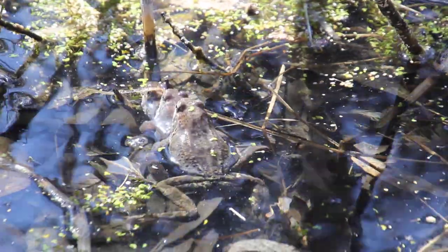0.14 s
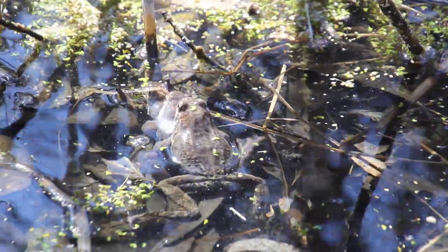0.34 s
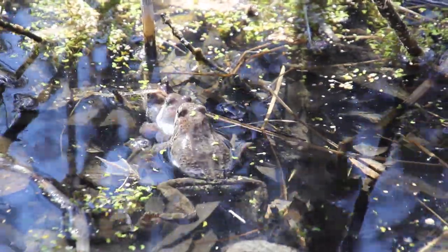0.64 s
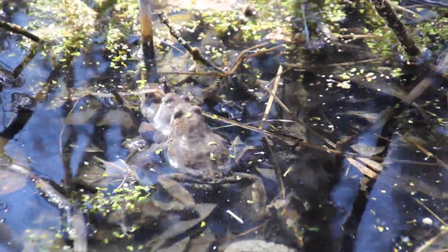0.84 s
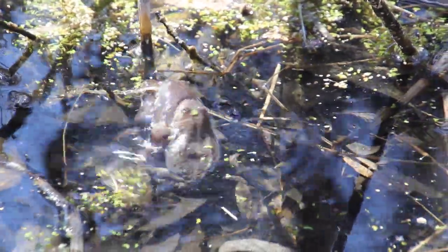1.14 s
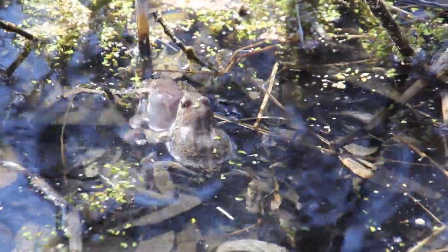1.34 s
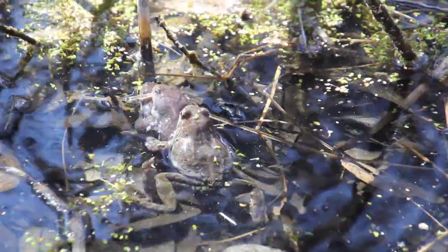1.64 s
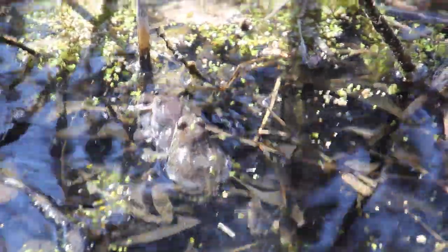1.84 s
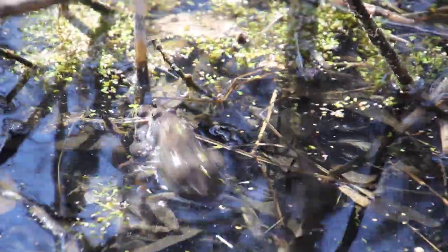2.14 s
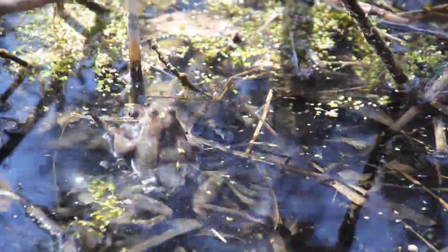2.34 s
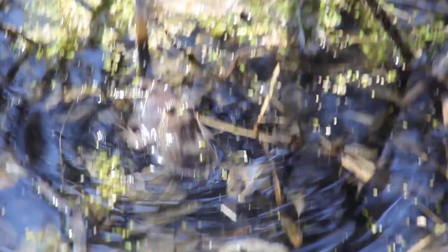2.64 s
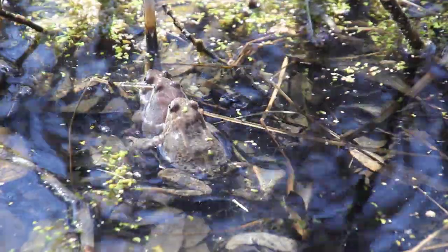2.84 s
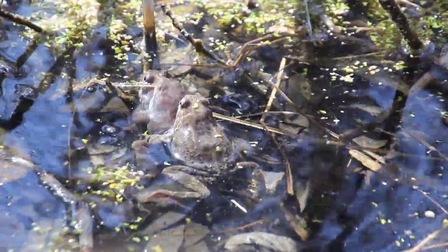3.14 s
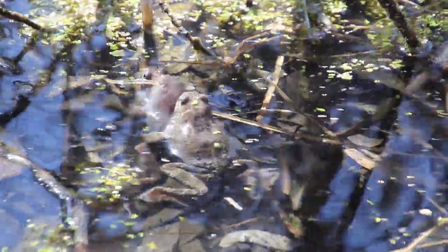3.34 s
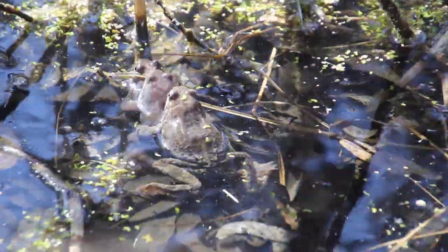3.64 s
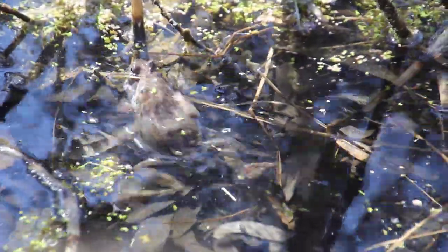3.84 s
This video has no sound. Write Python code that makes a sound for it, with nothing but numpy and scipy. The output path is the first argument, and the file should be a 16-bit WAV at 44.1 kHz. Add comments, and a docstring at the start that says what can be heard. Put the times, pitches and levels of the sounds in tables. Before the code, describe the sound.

Wind rumbles and thumps on the microphone over a pond, with faint water ticks and plops.

```python
"""A woodland pond, where toads jostle under a steady, distant rush of air.
Gusts brush the microphone, and their eddies thump on it, hardest near the end.
As the toads move, water and twigs tick faintly, trapped air pockets ring as plops,
and tiny bubbles crackle. A far bird gives one thin, high whistle of two joined notes,
scattered by the trees; a faint, higher squeak comes at the very end."""
import sys
import numpy as np
from scipy import signal
from scipy.fft import rfft, irfft
from scipy.io import wavfile
from scipy.ndimage import uniform_filter1d

SR = 44100
rng = np.random.default_rng(int(sys.argv[2]) if len(sys.argv) > 2 else 0)


def unload_audio(sound):
    """Save the sound as a 16-bit wav file, at the path given as the first command line argument."""
    columns = np.transpose(np.atleast_2d(sound))
    # keep every value between -1 and 1, then stretch to whole-number steps
    steps = np.round(np.clip(columns, -1, 1) * 32767)
    wavfile.write(sys.argv[1], SR, steps.astype(np.int16))


N = 176400
TIME = np.arange(N) / SR
LN_1000 = np.log(1000)  # exponent of a 60 dB decay


def wind():
    """Turbulent pressure on the microphone: each gust rumbles, and single eddies thump."""
    # gusts: t/s, duration/s, level/dB
    gusts = [(0.341, 0.027, -35.5), (1.1, 0.078, -33), (1.192, 0.024, -34), (1.526, 0.059, -34),
             (1.641, .14, -30.5), (1.823, 0.09, -27), (1.916, 0.082, -32.5), (2.457, 0.029, -31),
             (2.537, .07, -38), (2.637, 0.12, -27), (2.826, 0.076, -27), (2.924, 0.072, -26.5),
             (3.019, 0.047, -19.5), (3.121, 0.012, -17.5), (3.169, 0.1, -26.5), (3.296, 0.063, -25.5),
             (3.436, 0.048, -31), (3.551, 0.037, -21), (3.625, 0.05, -48), (3.753, 0.066, -28.5),
             (3.959, 0.045, -30.5)]
    # spectrum of the turbulence: f/Hz, relative density/dB
    turbulence = [(20, -16), (40, 3.5), (70, 6), (120, 4.5), (180, -10.5), (260, -14.5), (400, -32),
                  (700, -40.5), (1500, -75.5)]
    # eddies crossing the port: t/s, level/dB, centre f/Hz, roundness (low pops, high thumps)
    eddies = [(1.133, -21.5, 115, 6.5), (1.18, -20.5, 121, 8.1), (1.658, -16, 84, 6.8),
              (1.674, -14.5, 140, 4.7), (1.765, -20, 87, 3), (1.848, -14, 140, 7.5), (1.875, -15, 130, 4.3),
              (1.914, -25, 100, 4.6), (2.645, -16.5, 100, 1.2), (2.716, -13.5, 119, 3.3),
              (2.733, -25, 118, 3), (2.811, -16.5, 104, 4.1), (2.833, -23, 99, 3), (2.867, -15, 127, 2.3),
              (2.88, -14.5, 70, 2.4), (2.972, -18.5, 130, 6.9), (3.026, -7, 182, 1.65),
              (3.045, -8.5, 172, 7), (3.057, -3.5, 154, 7), (3.118, -10.5, 165, 8.2),
              (3.129, -11.5, 110, 3.5), (3.171, -26, 100, 5), (3.202, -14.5, 105, 6),
              (3.288, -14.5, 91, 4.5), (3.309, -8.5, 95, 3.2), (3.451, -21.5, 104, 5.9),
              (3.564, -16, 117, 8.7), (3.573, -3, 148, 3.7), (3.813, -19, 101, 3.8)]
    gust_power = sum((from_db(db) * swell(t, length, 0.01, 0.01)) ** 2 for t, length, db in gusts)
    flow = coloured(turbulence)
    flow /= np.sqrt(uniform_filter1d(flow ** 2, size=1800))  # even out the level over 41 ms
    lumpy_flow = rms_one(flow * from_db(2.5 * drift(60)))
    thumps = sum(from_db(db) * eddy(t, hz, roundness) for t, db, hz, roundness in eddies)
    return np.sqrt(gust_power) * lumpy_flow + thumps


def eddy(t, centre_hz, roundness):
    """A passing vortex swings the pressure steeply at its core and faintly on either side."""
    core_offset = 2 * np.pi * centre_hz * (TIME - t) / roundness
    return np.imag((1 + 1j * core_offset) ** -(roundness + 1))


def plops(attack_s=0.00052, t60_cycles=8.5, rise_per_s=6):
    """Bubble resonance: an air pocket rings as a damped oscillator, rising in pitch."""
    # air pockets closing in the water: t/s, level/dB, starting f/Hz
    pockets = [(2.899, -27, 510), (2.935, -31, 520), (2.976, -28, 506), (3.675, -23, 576),
               (3.719, -23, 520)]
    out = np.zeros(N)
    for t, db, hz in pockets:
        age = np.maximum(TIME - t, 0)
        envelope = (1 - np.exp(-age / attack_s)) * np.exp(-LN_1000 * age * hz / t60_cycles)
        phase = 2 * np.pi * hz * age * (1 + rise_per_s * age / 2)
        out += from_db(db) * envelope * np.sin(phase)
    return out


def ticks(edge_ratio=1.225, attack_s=0.001):
    """Damped transients: each tick is a bright band of noise that decays exponentially."""
    # water and twigs stirred by the toads: t/s, level/dB, centre f/Hz, T60/s
    impacts = [(.345, -59, 8700, 0.38), (.472, -41, 2900, 0.018), (.473, -44.5, 5100, 0.025),
               (.473, -49, 10000, 0.027), (.577, -48.5, 3500, 0.073), (.579, -55, 8100, 0.046),
               (.655, -54.5, 7500, .06), (0.704, -52.5, 7400, .05), (.849, -57, 12500, .07),
               (.882, -60, 12000, .04), (1.113, -62, 12000, .03), (1.242, -47.5, 4940, 0.029),
               (1.314, -57, 11500, .05), (2.006, -57, 11500, .06), (2.312, -46, 10500, .022),
               (2.324, -54.5, 9000, .1), (2.969, -58, 11900, .05), (3.534, -57, 8450, .06),
               (3.884, -58, 12000, .05)]
    out = np.zeros(N)
    for t, db, hz, t60 in impacts:
        burst = rms_one(band(rng.standard_normal(N), hz / edge_ratio, hz * edge_ratio))
        out += from_db(db) * burst * swell(t, 0, attack_s, t60 / LN_1000)
    return out


def crackle(median_per_s=240, level_db=-66.5, t60_cycles=15):
    """Impulse-excited resonance: tiny bubbles burst in random clumps among the duckweed."""
    bursts = rng.random(N) < median_per_s * from_db(6 * drift(10)) / SR
    strength = from_db(2.5 * np.minimum(rng.exponential(1, N), 4))
    clicks = bursts * strength * rng.choice([-1, 1], N)
    pitches_hz = np.geomspace(3500, 10000, 16)
    pitch_index = rng.integers(0, len(pitches_hz), N)
    out = np.zeros(N)
    for k, hz in enumerate(pitches_hz):
        angle = 2 * np.pi * hz / SR
        decay = np.exp(-LN_1000 * hz / t60_cycles / SR)
        resonator = [0, np.sin(angle)], [1, -2 * decay * np.cos(angle), decay ** 2]
        out += signal.lfilter(*resonator, clicks * (pitch_index == k) + 1e-18)
    return from_db(level_db) * rms_one(out)


def bird():
    """Frequency modulation: a far bird's thin whistle warbles at random about one pitch."""
    # two joined notes: t/s, duration/s, level/dB, f/Hz
    notes = [(3.285, 0.14, -59.5, 6840), (3.475, 0.19, -60, 6840)]
    return whistle(notes, waver_hz=65.2, waver_rate_hz=54.5)


def squeak():
    """Faster, wider frequency modulation roughens a very high, faint tone."""
    # one short note: t/s, duration/s, level/dB, f/Hz
    notes = [(3.958, .06, -58, 12060)]
    return whistle(notes, waver_hz=140, waver_rate_hz=140)


def whistle(notes, waver_hz, waver_rate_hz, edge_s=0.011, wood_t60_s=0.52, wood_db=-3):
    """Reverberation: a wavering pure tone arrives directly and scattered by the trees."""
    waver = waver_hz * drift(waver_rate_hz)
    direct = np.zeros(N)
    for t, length, db, hz in notes:
        phase = 2 * np.pi * np.cumsum(hz + waver) / SR
        direct += from_db(db) * swell(t, length, edge_s, edge_s) * np.sin(phase)
    echoes = rng.standard_normal(N) * np.exp(-LN_1000 * TIME / wood_t60_s)
    scattered = signal.fftconvolve(direct, echoes / np.linalg.norm(echoes))[:N]
    return direct + from_db(wood_db) * scattered


def rush(level_db=-40.5, crossover_hz=2700):
    """Broadband flow noise of far air in the trees; body and treble wander independently."""
    # spectrum of the rush: f/Hz, relative density/dB
    spectrum = [(20, -12.5), (50, 1), (100, 2), (170, -2), (280, -1.5), (450, -1.5), (750, -3.5),
                (1100, -6.5), (1600, -10), (2000, -15), (2700, -17), (4000, -25), (6000, -29), (8800, -31),
                (12000, -37), (15500, -41.5)]
    # slow swell below the crossover: t/s, relative level/dB
    breeze = [(0, -0.5), (.45, 0.1), (.75, 1), (1.2, 0.1), (1.7, -0.44), (2.2, 0.5), (2.55, -0.6),
              (2.9, .4), (3.45, 0.54), (3.75, 1), (4, 1.3)]
    # slow swell above the crossover: t/s, relative level/dB
    treble_swell = [(0, 0.5), (.7, 0), (1.4, 0), (2.2, -1), (2.5, 1.1), (3.3, 0.3), (4, 0.5)]
    air = coloured(spectrum)
    body = signal.sosfiltfilt(signal.butter(2, crossover_hz, fs=SR, output="sos"), air)
    treble = air - body
    body_db = np.interp(TIME, *np.transpose(breeze)) + 0.38 * drift(36)
    treble_db = np.interp(TIME, *np.transpose(treble_swell)) + 0.5 * drift(12)
    return from_db(level_db) * (body * from_db(body_db) + treble * from_db(treble_db))


def from_db(db):
    """Amplitude ratio for a level in decibels."""
    return 10 ** (np.asarray(db) / 20)


def rms_one(x):
    """Normalisation to unit rms."""
    return x / np.sqrt(np.mean(x ** 2) + 1e-20)


def drift(corner_hz):
    """Slow random fluctuation: low-passed noise of unit rms."""
    hz = np.arange(N // 2 + 1) * SR / N
    return rms_one(irfft(rfft(rng.standard_normal(N)) / (1 + (hz / corner_hz) ** 2), N))


def coloured(spectrum):
    """Spectral shaping: unit-rms noise that follows rows of f/Hz, relative density/dB."""
    hz, db = np.transpose(spectrum)
    bins = np.maximum(np.arange(N // 2 + 1) * SR / N, 1)
    gain = from_db(np.interp(np.log(bins), np.log(hz), db)) * np.minimum(bins / hz[0], 1)
    return rms_one(irfft(rfft(rng.standard_normal(N)) * gain, N))


def band(x, low_hz, high_hz):
    """Band-pass filtering between two edge frequencies."""
    edges_hz = [low_hz, min(high_hz, SR / 2 - 10)]
    return signal.sosfilt(signal.butter(3, edges_hz, "band", fs=SR, output="sos"), x)


def swell(start, length, rise_s, fall_s):
    """Envelope with an exponential rise, a hold and an exponential fall."""
    before, after = np.maximum(start - TIME, 0), np.maximum(TIME - start - length, 0)
    return np.exp(-before / rise_s - after / fall_s)


def scene():
    """Superposition: the pressures of all sources add at one microphone."""
    calls = bird() + squeak()
    return (wind() + rush() + ticks() + plops() + crackle() + calls)[None]


def record(dry):
    """Band limiting: a steep low-pass filter cuts the highest treble."""
    cutoff_hz = 15650
    return signal.sosfilt(signal.ellip(12, 0.1, 80, cutoff_hz, fs=SR, output="sos"), dry)


dry = scene()
out = record(dry)
unload_audio(out)
```